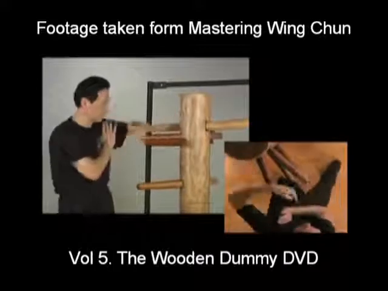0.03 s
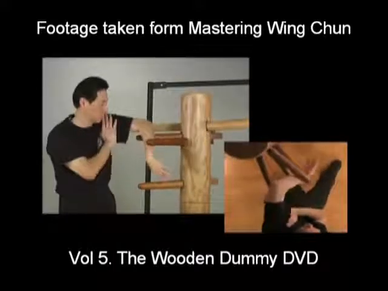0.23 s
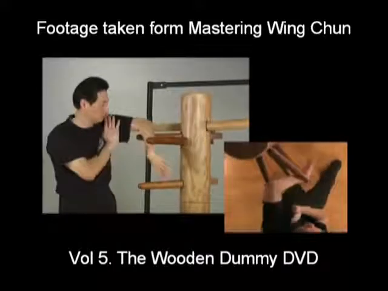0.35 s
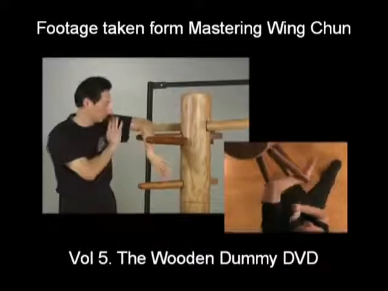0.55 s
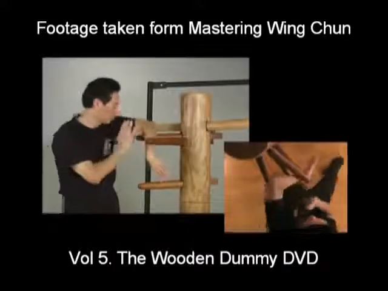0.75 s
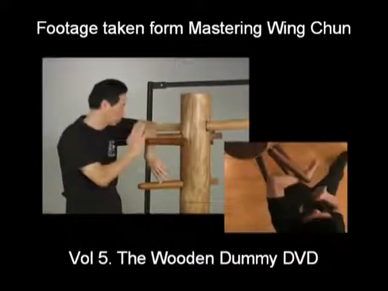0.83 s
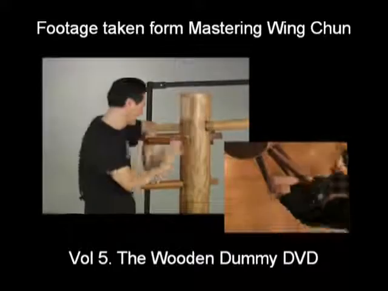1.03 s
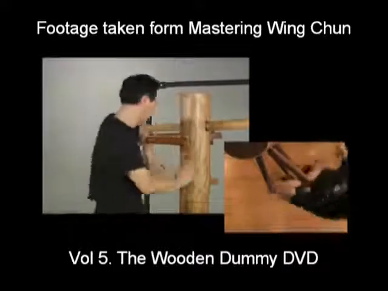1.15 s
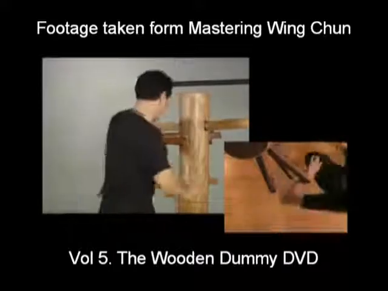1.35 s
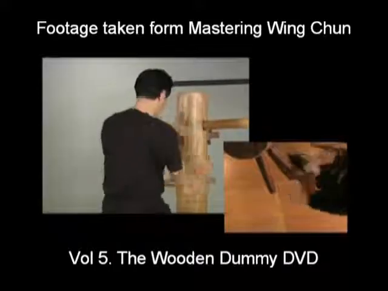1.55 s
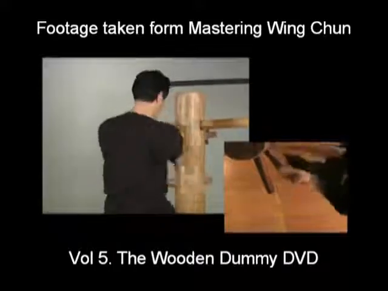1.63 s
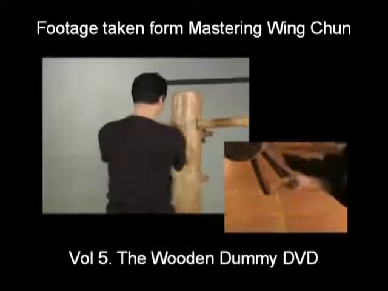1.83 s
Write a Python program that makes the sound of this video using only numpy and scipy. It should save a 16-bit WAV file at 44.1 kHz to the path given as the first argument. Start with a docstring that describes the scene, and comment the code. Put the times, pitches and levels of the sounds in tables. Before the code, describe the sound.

A wooden training dummy is struck indoors: first a loud clack with a brief rattle, then a muffled thump and a faint brush of cloth, finally a thud running into a second rattling clack. Both clacks slightly overload the microphone.

```python
"""Blows on a wooden training dummy

Forearms strike the dummy in a bare room, each contact a dull, heavily damped thud of flesh.
A hard blow slams a loose wooden arm against its slot in the trunk, where it rings and rattles.
The trunk rocks on its frame, wood squeaks, and clothes rustle by friction between the moves.
The sound is nearly mono, and the recorder clips on the two hardest knocks."""
import sys
import numpy as np
from scipy import signal
from scipy.fft import rfft, irfft, next_fast_len
from scipy.io import wavfile

SR = 44100
rng = np.random.default_rng(int(sys.argv[2]) if len(sys.argv) > 2 else 0)


def dump_mix(stems):
    """Bounce the given channels to the path in sys.argv[1] as a 16-bit WAV at rate SR."""
    frames = np.atleast_2d(stems).T  # one column per channel
    limited = np.clip(frames, -1, 1)  # hard clip at full scale
    pcm = np.round(limited * 32767).astype(np.int16)
    wavfile.write(sys.argv[1], SR, pcm)


N = 83790


# knocks of each arm and their early repeats from the room:
# t/s, ring level/dB, clack level/dB, tilt/(dB/octave), pitch shift/%
UPPER_KNOCKS = [(.2068, -5.5, -8, 2, 12.5), (.2122, 3.5, -12.5, 0, 1), (.2545, -17.5, -37.5, -13, 5.5),
                (.2845, -11.5, -31, -5.5, -2), (.2925, -13.5, -10, -5.5, -3.5), (.349, -22, -18.5, -3.5, 1),
                (.742, -60.5, -70.5, -2, -3.5)]
LOWER_KNOCKS = [(1.512, -3.5, -5.5, -11.5, 0), (1.520, -7.5, -6, -0.5, 0), (1.535, -0.5, -8.5, 3, 0.031),
                (1.539, -29, -15, 0.5, 0), (1.5816, -9.5, -18, -2, 0.0047), (1.816, -33.5, -25, -9, 0.024)]
# normal modes of each arm, before shift and tilt: f/Hz, level/dB, T60/s
UPPER_MODES = [(586, -25.5, .07), (627.3, -17, .46), (649.2, 3.5, 0.075), (670.7, -13.5, .24),
               (732, -13, 0.046), (825, -16, 0.053), (973, -25, 0.1), (1073, -20, .12), (1388, -22, 0.17),
               (1672, -25, 0.12), (1922, -26.5, 0.13), (2259, -28, 0.12), (2445, -33, .08),
               (3024, -31, .09), (6846, -42.5, .06)]
LOWER_MODES = [(565, -8.5, .1), (651.5, 1, .08), (669, -17.5, 0.11), (820.6, -13, .07), (1038, -15, .045),
               (1091, -4.5, 0.074), (1278, -21, 0.058), (1390, -23, .07), (1650, -17, 0.088),
               (1823.6, -20, .09), (1859, -16.5, 0.081), (2320, -32, .07), (5430, -41.5, 0.11)]
# spectra of the dense, quickly damped wood modes: f/Hz, level/dB
UPPER_CLACK = [(40, -30), (170, -6), (300, -11.5), (450, -11), (750, 12.5), (1400, 3), (2800, -7.5),
               (3600, -17), (6500, -25.5), (9000, -36), (16000, -45.5)]
LOWER_CLACK = [(40, -17), (170, -6.5), (420, 2.5), (950, 20.5), (1900, 3.5), (2500, 2.5), (3600, -12.5),
               (6000, -19.5), (9500, -34.5), (16000, -38.5)]
# their decay times: f/Hz, T60/s
CLACK_T60 = [(150, .14), (900, 0.053), (3000, 0.066), (12000, 0.12)]

def wooden_arm(knocks, modes, clack_spectrum, tilt_from_hz=1300):
    """Free vibration: the arm hits its slot and rings; each knock has its own brightness and pitch."""
    out = np.zeros(N)
    for start, ring_db, clack_db, tilt_db, shift in knocks:
        bright_db = lambda hz: tilt_db * np.log2(np.hypot(1, hz / tilt_from_hz))
        dense_modes = filtered(noise(clack_spectrum), lambda hz: amp(bright_db(hz)))
        clack = damped(dense_modes, CLACK_T60) * onset(0.0015)
        struck_modes = [(hz * (1 + shift / 100), db + bright_db(hz), t60) for hz, db, t60 in modes]
        knock = amp(ring_db) * ring(struck_modes) + amp(clack_db) * clack
        out += in_room(at(start, knock), wet_db=-8)
    return out


# thuds of forearm or palm on the wood, and their quick echoes from the room:
# t/s, thud level/dB, pat level/dB, slap level/dB
THUDS = [(1.009, -14.5, -35.5, -63), (1.0245, -35, -32, -78), (1.030, -23.5, -61.5, -80),
         (1.472, -7, -33.5, -39.5), (1.4858, -31.5, -30.5, -39), (1.492, -15.5, -30.5, -47.5)]
# modes of the thud: f/Hz, level/dB, T60/s
THUD_MODES = [(189, -28.5, .08), (227.9, -11.5, 0.11), (259.4, -4.5, 0.048), (339, -5.5, 0.043),
              (380, -18, 0.13), (454, -11, 0.056)]
# spectra of the soft pat and the bright slap of skin: f/Hz, level/dB
PAT_SPECTRUM = [(60, -16), (200, 1.5), (550, 3), (800, -3), (1270, -1), (1600, -11.5), (2100, -12.5),
                (3200, -29), (8000, -41.5), (16000, -51)]
SLAP_SPECTRUM = [(500, -1), (3000, -10.5), (4900, -4), (6500, -9.5), (10000, -16.5), (16000, -27.5)]

def forearms(low_cut_hz=130):
    """Soft impact: flesh on wood excites low, damped modes, with a pat and a slap of skin."""
    out = np.zeros(N)
    for start, thud_db, pat_db, slap_db in THUDS:
        thud = amp(thud_db) * ring(THUD_MODES)
        pat = amp(pat_db) * burst(PAT_SPECTRUM, t60=0.15)
        slap = amp(slap_db) * burst(SLAP_SPECTRUM, t60=0.075)
        out += at(start, thud + pat + slap)
    low_cut = signal.butter(2, low_cut_hz, "highpass", fs=SR, output="sos")
    return in_room(signal.sosfilt(low_cut, out), wet_db=-9.5)


# sharp clicks in the rattle: t/s, level/dB
TICKS = [(1.6117, -25), (1.619, -25)]
# their spectrum: f/Hz, level/dB
TICK_SPECTRUM = [(500, -23), (2500, 8.5), (5500, 0), (9000, -3), (16000, -10)]

def ticks():
    """Brief contacts have broad spectra: the dummy settles with thin clicks."""
    clicks = sum(at(start, amp(db) * burst(TICK_SPECTRUM, t60=0.011)) for start, db in TICKS)
    return in_room(clicks, wet_db=-4.5)


# bumps of the trunk on its frame, and a footstep at 1.662 s: t/s, level/dB
BUMPS = [(.213, -26.5), (.30, -35.5), (0.346, -46), (1.586, -27), (1.662, -29.5)]
# their spectrum: f/Hz, level/dB
BUMP_SPECTRUM = [(25, -17.5), (60, -13.5), (110, -3), (190, -6.5), (350, -4), (600, -16.5), (1500, -32),
                 (8000, -74.5)]

def rocking_trunk():
    """Damped low-frequency vibration: the trunk bumps softly as it rocks under the blows, and a foot steps on
    the floor."""
    bumps = sum(at(start, amp(db) * burst(BUMP_SPECTRUM, t60=0.16) * onset(0.0017))
                for start, db in BUMPS)
    return in_room(bumps, wet_db=-6)


# sleeve and skin brushing past: peak t/s, 20 dB rise/s, 20 dB fall/s, rub level/dB, hiss level/dB
BRUSHES = [(0.919, 0.018, .09, -49.5, -81), (1.23, 0.12, 0.1, -47, -81.5),
           (1.255, 0.017, 0.054, -45.5, -56.5)]
# spectra of the low rub and the high hiss: f/Hz, level/dB
RUB_SPECTRUM = [(50, -25), (180, -3.5), (500, 1), (900, -2.5), (1700, -7.5), (3000, -22.5), (8000, -34.5),
                (16000, -57)]
HISS_SPECTRUM = [(500, 5), (2200, -9), (3000, -2.5), (3700, -3), (4600, -5), (7000, -12), (16000, -26.5)]

def sleeves(grain_db=3, grains_per_s=250):
    """Friction noise: sliding cloth and skin make grainy swells."""
    t, out = np.arange(N) / SR, np.zeros(N)
    for peak, rise, fall, rub_db, hiss_db in BRUSHES:
        swell = amp(-20 * np.maximum((peak - t) / rise, (t - peak) / fall))
        grain = amp(grain_db * np.interp(t * grains_per_s, np.arange(N), rng.standard_normal(N)))
        friction = amp(rub_db) * noise(RUB_SPECTRUM) + amp(hiss_db) * noise(HISS_SPECTRUM)
        out += swell * grain * friction
    return in_room(out, wet_db=-9.5)


# slips of wood on wood: t/s, f/Hz, level/dB
SQUEAKS = [(0.351, 4090, -48.5), (1.245, 3000, -45.5), (1.249, 4420, -53)]

def squeaks(half_width_hz=200):
    """Frictional excitation: slipping wood gives a narrow noise band, heard as a short rough tone."""
    t, out = np.arange(N) / SR, np.zeros(N)
    for start, centre_hz, db in SQUEAKS:
        band = lambda hz: 1 / (1 + ((hz - centre_hz) / half_width_hz) ** 4)
        tone = filtered(rng.standard_normal(N), band)
        envelope = fade(t, t60=0.05) * onset(0.0015)
        out += at(start, amp(db) * tone / tone.std() * envelope)
    return in_room(out, wet_db=-8)


# early reflections from the nearest walls: delay/s, level/dB
WALL_ECHOES = [(.0206, -19), (.0455, -16), (.072, -16.5)]
# reverberation time: f/Hz, T60/s
ROOM_T60 = [(100, .62), (250, 0.48), (650, 0.45), (2000, 0.47), (5000, 0.31), (9000, .38), (15000, 0.43)]
# colour of the diffuse field: f/Hz, level/dB
ROOM_COLOUR = [(40, -8), (170, 3), (400, 4), (650, -3), (1200, -1.5), (2500, -0.5), (6000, 4), (15000, -3)]

def in_room(x, wet_db, tail_delay_s=0.012, build_s=0.022, wall_cutoff_hz=1480):
    """Reverberation: dull early reflections and a diffuse tail add to the direct sound."""
    tail = damped(rng.standard_normal(N), ROOM_T60) * onset(build_s)
    tail = at(tail_delay_s, tail / np.linalg.norm(tail))
    tail = filtered(tail, lambda hz: amp(along(ROOM_COLOUR, hz)))
    walls = lambda hz: sum(amp(db) * np.exp(-2j * np.pi * hz * delay) for delay, db in WALL_ECHOES)
    echoes = filtered(x, lambda hz: walls(hz) / (1 + 1j * hz / wall_cutoff_hz))
    return x + echoes + amp(wet_db) * signal.fftconvolve(x, tail)[:N]


# noise spectra, in phase and in antiphase between the channels: f/Hz, level/dB
FLOOR_SPECTRUM = [(15, -33), (25, -8.5), (91, -10.5), (188, -1), (410, -8), (631, -11), (1240, -12.5),
                  (1530, -20), (1660, -15.5), (2850, -18.5), (3440, -23), (6210, -18.5), (15500, -17)]
SIDE_SPECTRUM = [(50, 13.5), (1000, -6), (4000, -9), (9000, 0.5), (15000, -1.5)]

def noise_floor():
    """Stationary noise: room tone and recorder hiss, partly correlated between left and right."""
    mid = amp(-61.5) * noise(FLOOR_SPECTRUM)
    side = amp(-65.5) * noise(SIDE_SPECTRUM)
    return np.array([mid + side, mid - side])


def ring(modes, scatter_db=0.5):
    """Modal superposition: damped sinusoids, a little different in strength at every blow."""
    t = np.arange(N) / SR
    partials = (amp(db + scatter_db * rng.standard_normal()) * np.sin(2 * np.pi * hz * t) * fade(t, t60)
                for hz, db, t60 in modes)
    return onset(0.0017) * sum(partials)


def burst(spectrum, t60):
    """Noise transient: a sharp attack and an exponential decay."""
    return noise(spectrum) * fade(np.arange(N) / SR, t60) * onset(0.00034)


def noise(spectrum):
    """Spectral shaping: noise of rms 1 with the given relative spectral density."""
    x = filtered(rng.standard_normal(N), lambda hz: amp(along(spectrum, hz)))
    return x / x.std()


def damped(x, t60s):
    """Frequency-dependent damping: each band of x decays at its own rate."""
    hz, t, bands = signal.stft(x, SR, nperseg=256)
    decay = fade(t, along(t60s, hz)[:, None])
    return signal.istft(bands * decay, SR, nperseg=256)[1][:N]


def filtered(x, response):
    """Linear filtering: the spectrum of x times a frequency response."""
    size = next_fast_len(N + SR // 2)
    hz = np.fft.rfftfreq(size, 1 / SR)
    return irfft(rfft(x, size) * response(hz), size)[..., :N]


def fade(t, t60):
    """Exponential decay, 60 dB down at t60."""
    return np.exp(-np.log(1000) * t / t60)


def onset(attack_s):
    """First-order rise from 0 to 1 with time constant attack_s."""
    return 1 - np.exp(-np.arange(N) / SR / attack_s)


def at(start_s, x):
    """Pure delay of x by start_s."""
    return np.pad(x, (max(round(start_s * SR), 0), 0))[:N]


def along(points, hz):
    """Interpolation of (f/Hz, value) points on a logarithmic frequency axis."""
    f, values = np.transpose(points)
    return np.interp(np.log(hz + 1), np.log(f + 1), values)


def amp(db):
    """Amplitude ratio of a level in decibels."""
    return 10 ** (np.asarray(db) / 20)


def scene():
    """Superposition: all sources are centred; only faint hiss differs between the ears."""
    upper_arm = wooden_arm(UPPER_KNOCKS, UPPER_MODES, UPPER_CLACK)
    lower_arm = wooden_arm(LOWER_KNOCKS, LOWER_MODES, LOWER_CLACK)
    centre = upper_arm + lower_arm + forearms() + ticks() + sleeves() + rocking_trunk() + squeaks()
    return centre + noise_floor()


def record(dry, hardness=12, band_limit_hz=15750):
    """Saturation and band limiting: the recorder clips at full scale and cuts the highest treble."""
    clipped = dry / (1 + np.abs(dry) ** hardness) ** (1 / hardness)
    return filtered(clipped, lambda hz: hz < band_limit_hz)


dry = scene()
out = record(dry)
dump_mix(out)
```